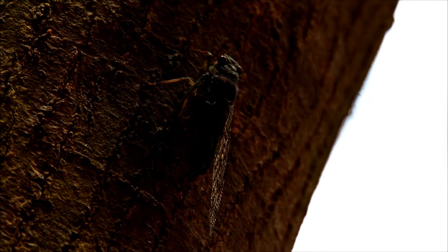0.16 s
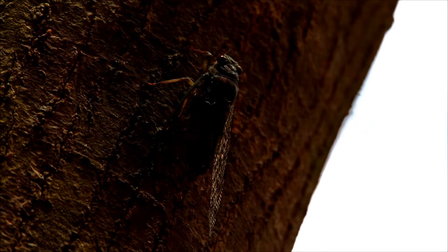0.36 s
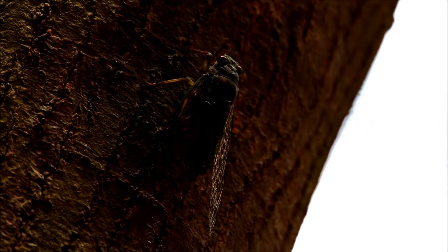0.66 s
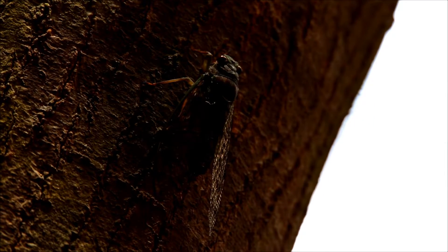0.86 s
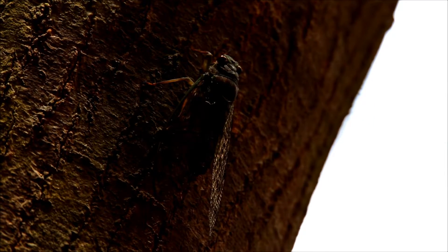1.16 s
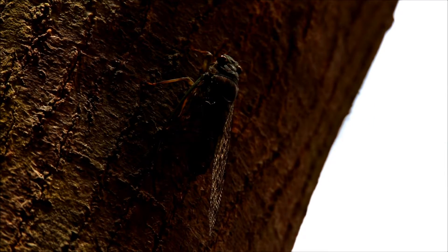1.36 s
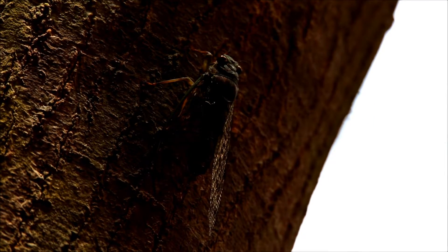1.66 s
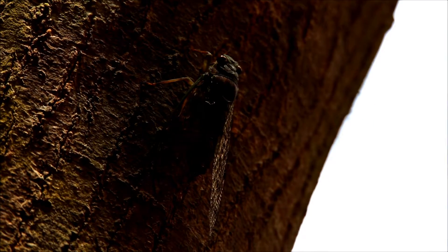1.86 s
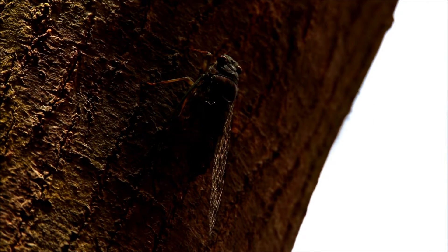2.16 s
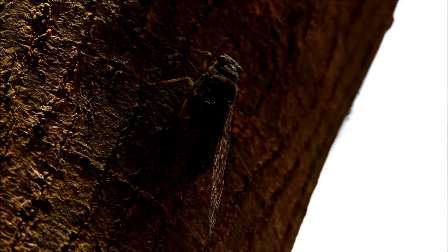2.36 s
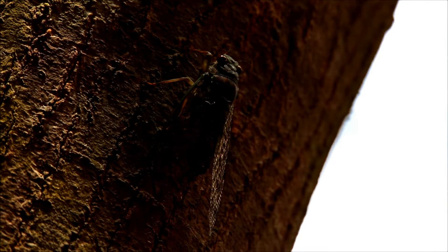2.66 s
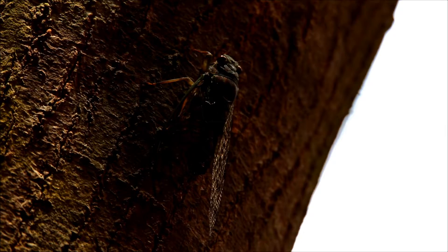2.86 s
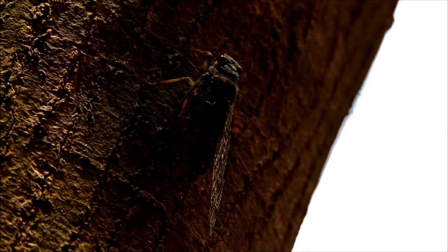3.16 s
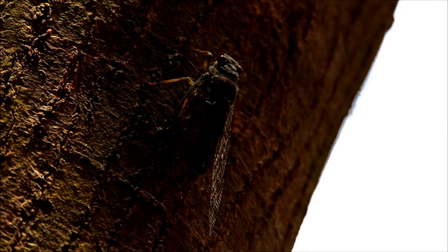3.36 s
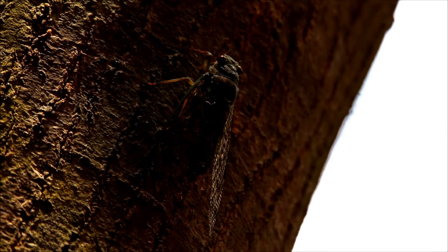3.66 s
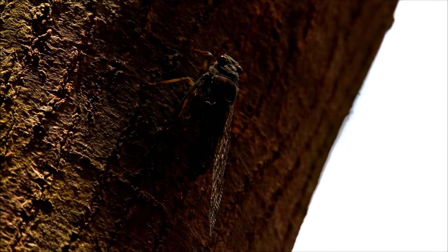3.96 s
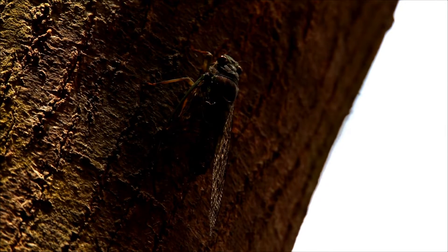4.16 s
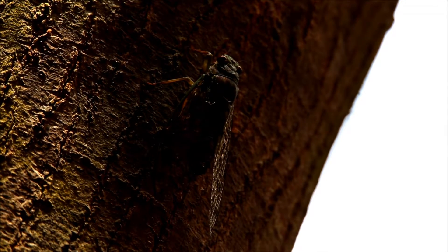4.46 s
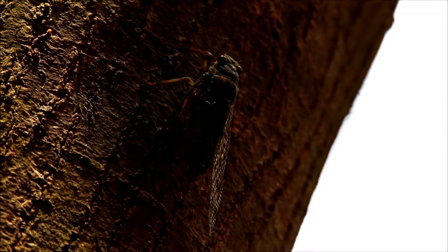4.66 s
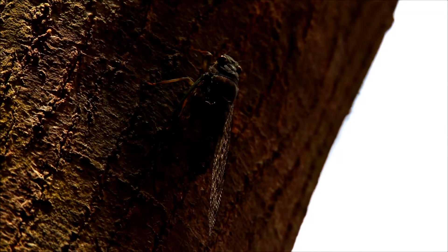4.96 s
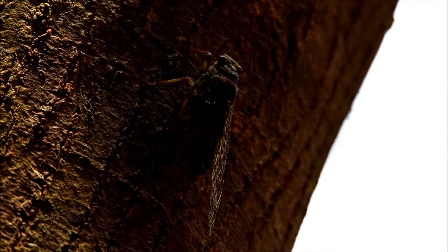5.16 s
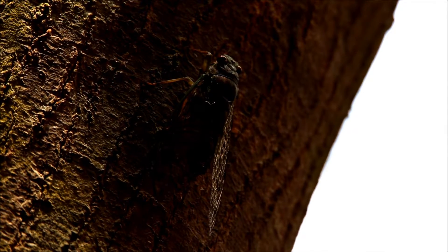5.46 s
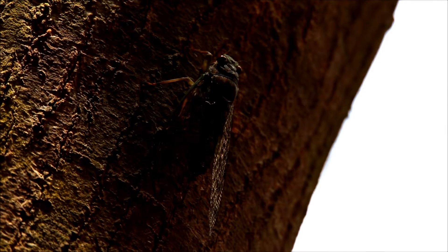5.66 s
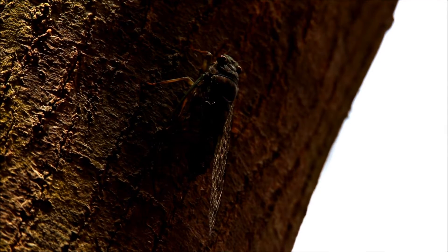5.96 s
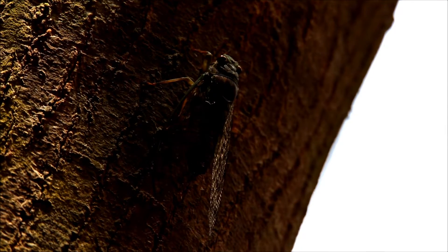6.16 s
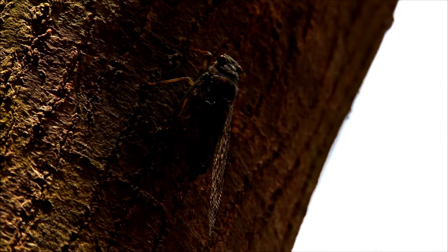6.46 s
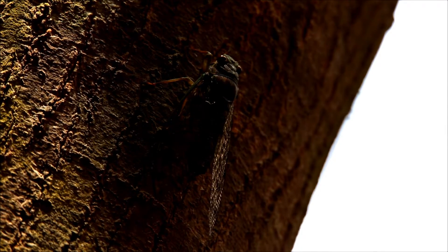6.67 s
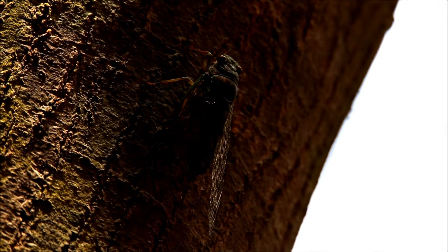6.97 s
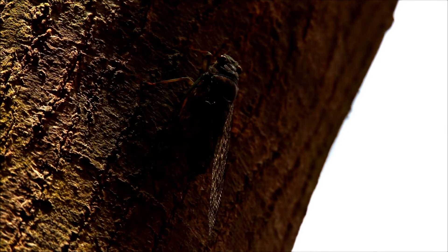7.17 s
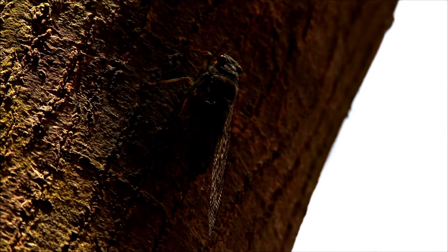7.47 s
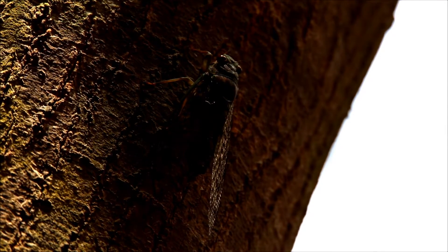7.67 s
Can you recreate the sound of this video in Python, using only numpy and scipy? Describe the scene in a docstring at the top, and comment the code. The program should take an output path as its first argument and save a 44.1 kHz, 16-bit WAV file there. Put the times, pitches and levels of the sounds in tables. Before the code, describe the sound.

Outdoors by a tree, a soft high insect hiss surrounds the listener, with short pulsing rasps and sharp, mid-high ticks at uneven intervals, singly or in quick pairs. One small snap falls near two seconds. The nearby cicada grows steadily from weak buzzing, jumps louder just after four seconds, and holds a dense shrill buzz to the end, nearly covering the background. Wide, natural stereo, close to the insect.

```python
"""A cicada on a tree trunk swells into full song over short rasps and a distant chorus of its kind.
Its two tymbals (ribbed drum skins) buckle in turn, rib by rib, 45 to 50 times a second, and these
clicks ring the hollow abdomen. The rasps, the chorus and the murmur of the air are shaped noise.
Dry, low ticks, perhaps a scolding bird, are short tones with close echoes; a small snap and knock
in the tree are dying bursts of noise. A puff of breeze and a far motor's drone pass low down."""
import sys
import numpy as np
from scipy import signal
from scipy.fft import rfft, irfft, next_fast_len
from scipy.io import wavfile
from scipy.ndimage import uniform_filter1d, map_coordinates

SR = 44100
rng = np.random.default_rng(int(sys.argv[2]) if len(sys.argv) > 2 else 0)


def put_to_file(sound):
    """Save the sound as 16-bit audio at rate SR, in the file named by the first command-line argument."""
    columns = np.atleast_2d(sound).T  # one column per channel
    safe = np.clip(columns, -1, 1)
    whole_steps = np.round(safe * 32767)
    wavfile.write(sys.argv[1], SR, whole_steps.astype(np.int16))


N = 343980  # length of the scene in samples


def amp(db):
    """Decibels to gain."""
    return 10 ** (np.asarray(db) / 20)


def unit(x):
    """x scaled to an rms (average strength) of 1."""
    return x / np.sqrt(np.mean(x ** 2) + 1e-20)


def along(points, hz):
    """(frequency, value) points joined by straight lines on a log frequency axis."""
    point_hz, values = np.transpose(points)
    return np.interp(np.log(hz + 1), np.log(point_hz + 1), values)


def wobble(rate):
    """A smooth random curve through `rate` random points a second."""
    points = rng.standard_normal(int(N * rate / SR) + 4)
    return map_coordinates(points, [np.arange(N) * rate / SR])


def ease(at_s, span_s):
    """An S-curve from 0 to 1, half way at at_s."""
    return .5 + .5 * np.tanh((np.arange(N) / SR - at_s) / (2 * span_s))


def hump(at_s, rise_s, fall_s):
    """A smooth swell from 0 to 1 and back, with its crest at at_s."""
    t = np.arange(N) / SR - at_s
    return np.exp(-(t / np.where(t < 0, rise_s, fall_s)) ** 2)


def filtered(x, response):
    """x with each frequency multiplied by response(frequency)."""
    size = next_fast_len(N + SR // 2)
    hz = np.fft.rfftfreq(size, 1 / SR)
    return irfft(rfft(x, size) * response(hz), size)[..., :N]


def rung(x, spectrum, size=2048):
    """x ringing a body of the given spectrum, which only answers after it is struck."""
    level = amp(along(spectrum, np.fft.rfftfreq(size, 1 / SR)))
    # folding the cepstrum (spectrum of the log spectrum) moves all the ringing after the strike
    cepstrum = irfft(np.log(level))
    cepstrum[1:size // 2] *= 2
    cepstrum[size // 2 + 1:] = 0
    ringing = irfft(np.exp(rfft(cepstrum)))
    return signal.fftconvolve(x, ringing[None], axes=1)[:, :N]


def impulses(times, sizes, order=8):
    """Sharp pulses at times that may fall between samples."""
    at = np.ravel(times)[:, None] * SR
    index = np.floor(at).astype(int) + np.arange(1 - order, order + 1)
    # each pulse is a windowed sinc spread over the nearest samples
    taps = np.ravel(sizes)[:, None] * np.sinc(index - at) * np.sinc((index - at) / order)
    inside = (index >= 0) & (index < N)
    return np.bincount(index[inside], taps[inside], N)


def scattered(x, t60):
    """Diffuse echo from bark and leaves, dying by 60 dB in t60 seconds, different at each ear."""
    t = np.arange(SR // 3) / SR
    fade = amp(-60 * t / t60) * (1 - np.exp(-t / 0.0011))
    tail = rng.standard_normal((2, len(t))) * fade
    return signal.fftconvolve(x[None], tail / np.linalg.norm(tail[0]), axes=1)[:, :N]


def rush(spectrum):
    """Stereo noise of rms 1 arriving from all around."""
    # how alike the two ears hear: (frequency [Hz], left-right likeness [0-1])
    alike = [(40, 0.27), (150, 0.22), (500, 0.45), (1500, 0.68), (4000, 0.37), (8000, 0.5), (13000, 0.22)]

    def mid_and_side(hz):
        # more side against mid makes the two ears less alike
        turn = np.arccos(np.clip(along(alike, hz), -1, 1)) / 2
        return amp(along(spectrum, hz)) * [np.cos(turn), np.sin(turn)]

    mid, side = filtered(rng.standard_normal((2, N)), mid_and_side)
    return unit(np.array([mid + side, mid - side]))


def cicada():
    """Rib clicks and their fine rasp ring the abdomen, whose resonances shift as it stretches."""
    # the body's voice when slack, half stretched and taut: (frequency [Hz], level [dB])
    slack_voice = [(2000, -55), (3270, -13), (3890, -2.5), (4480, -8), (4650, -4), (4950, -9), (5560, 0),
                   (5900, -1), (7120, -9), (8260, -17), (9010, -13.5), (9610, -20.5), (11970, -27),
                   (15580, -37)]
    half_voice = [(2000, -55), (3070, -18), (3620, -1.5), (4230, -7), (4740, 0), (5080, -6), (5740, 0),
                  (7230, -7), (8270, -13.5), (9250, -11), (10170, -21), (11840, -23.5), (15630, -38)]
    taut_voice = [(2000, -55), (2900, -25), (3190, -13), (3690, -1), (4060, -8.5), (4730, 0), (5010, -6.5),
                  (5540, 0), (7110, -6.5), (8020, -12), (9270, -11), (10040, -17.5), (11720, -19.5),
                  (15670, -37)]
    level_db, rate, stretch = singing()
    # the weaker tymbal nearly catches up at full stretch, so the throb evens out
    second_db = -5.5 + 4.3 * stretch
    uneven_rate = rate * (1 + 0.000987 * wobble(6))
    clicks = tymbals(uneven_rate, second_db, jitter=.000025, scatter_db=0.8, offset=.49)
    # the membrane crackles for as long as its ribs are buckling
    crackle = np.sqrt(np.abs(uniform_filter1d(clicks ** 2, size=260)))
    near = clicks + amp(0.5) * unit(crackle * rng.standard_normal(N))
    # bending waves carry the treble first, so each click smears downward in pitch
    near = filtered(near, lambda hz: np.exp(-2.8j * np.sqrt(hz)))
    # nearby bark answers with a steady echo; stirring foliage blurs the rest into a wash
    echo = amp(-8.0) * scattered(near, t60=0.1)
    wash = amp(-1.0) * rush([(3000, 3.6), (9000, 6), (15000, 2.6)])
    drive = filtered(near * amp([[.9], [-.9]]) + echo + wash, resonant)
    # crossfade from slack through half stretched to taut
    song = 0
    for k, voice in enumerate((slack_voice, half_voice, taut_voice)):
        share = np.maximum(0, 1 - np.abs(2 * stretch - k))
        song = song + share * unit(rung(drive, voice))
    return song * amp(level_db)


def singing():
    """Warming up makes the song louder and faster; late in the swell the abdomen stretches."""
    # abrupt harder efforts: (time [s], added level [dB])
    pushes = [(4.19, 3), (4.95, 1.5), (6.35, 0.72)]
    push_s = .02  # time constant of a push
    warm_at_s, warm_s = 3.12, .9  # midpoint and time constant of the warming up
    idle_db, warm_db = -54, -37  # level before the pushes and a slight wavering
    idle_hz, warm_hz = 45.1, 49.9  # muscle rhythm, cycles a second
    # the stretch (0 slack, 1 taut) at rest, when it starts to grow, and its time constant
    rest_stretch, stretch_at_s, stretch_s = 0.18, 5.06, 0.81
    warmth = ease(warm_at_s, warm_s)
    effort_db = sum(db * ease(s, push_s) for s, db in pushes)
    level_db = idle_db + (warm_db - idle_db) * warmth + effort_db
    rate = idle_hz + (warm_hz - idle_hz) * warmth
    stretching_s = np.maximum(0, np.arange(N) / SR - stretch_at_s)
    slack = (1 - rest_stretch) * np.exp(-stretching_s / stretch_s)
    return level_db + 0.35 * wobble(5.7), rate, np.clip(1 - slack, 0, 1)


def tymbals(rate, second_db, jitter, scatter_db, offset):
    """Two tymbals take turns, one weaker; each pull snaps a row of ribs whose spacing drifts slowly."""
    # ribs of one tymbal buckling, before drift and scatter: (time after the first [s], level [dB])
    ribs = [(0, -6), (.00102, -17), (.00205, -7), (.00303, -9), (.00405, -11.5), (.0064, -5)]
    t = np.arange(N) / SR
    cycles = np.cumsum(rate) / SR
    delay, rib_db = np.transpose(ribs)
    clicks = np.zeros(N)
    for lag, side_db in ((0, 0), (offset, second_db)):
        pulls = np.interp(np.arange(int(cycles[-1])) + lag, cycles, t)
        spacing = 1 + 0.022 * np.interp(pulls, t, wobble(2))
        chance = rng.standard_normal((len(pulls), 2, len(ribs)))
        times = pulls[:, None] + spacing[:, None] * delay + jitter * chance[:, 0]
        clicks += amp(side_db) * impulses(times, amp(rib_db + scatter_db * chance[:, 1]))
    return unit(clicks / np.hypot(1, amp(second_db)))


def resonant(hz):
    """Narrow resonances that stand out of the body's voice, added to the plain path."""
    # (centre frequency [Hz], width [Hz], level [dB])
    modes = [(3430, 59, -3.5), (3674, 29, 1.5), (3720, 30, -12), (4150, 16, -9), (4170, 38, -1),
             (4420, 32, -10), (4540, 27, -4), (4750, 40, -13), (5490, 60, -7.5), (5820, 20, -1.5),
             (5870, 38, -11), (6170, 19, -14), (6150, 37, -16), (6495, 35, -4.5), (6970, 31, -1.5),
             (7470, 80, -6.5)]
    total = 1
    for centre, width, db in modes:
        damping = 1j * hz * width
        total = total + amp(db) * damping / (centre ** 2 - hz ** 2 + damping)
    return total


def rasps():
    """Each rasp, perhaps from a neighbouring cicada, is a brief swell of the same bright hiss."""
    # (time of the crest [s], level [dB])
    rasp_list = [(.2, -51), (.5, -53), (.96, -55), (1.49, -51), (2.01, -52), (2.47, -55), (2.78, -54),
                 (3.07, -49), (3.54, -53), (3.96, -50), (4.27, -52), (4.59, -50), (5.03, -48), (5.34, -47),
                 (5.7, -50), (6.1, -49), (6.5, -51), (6.84, -47.5), (7.29, -48), (7.54, -44)]
    # colour of a rasp: (frequency [Hz], level [dB])
    rasp_voice = [(2000, -28), (3600, -3), (6000, 4), (8500, -2), (11000, -6), (15500, -18)]
    rasp_s = 0.058  # time from a rasp's crest to its flank
    swells = sum(amp(db) * hump(s, rasp_s, rasp_s) for s, db in rasp_list)
    return rush(rasp_voice) * swells


def ticks(pitch_hz, vary):
    """Slightly differing ticks, each repeated by the same nearby surfaces."""
    # ticks before echoes and ear levels: (time [s], level [dB])
    tick_list = [(0.001, -36.5), (0.1934, -34), (0.2323, -34.5), (0.6739, -33), (0.7112, -31.5),
                 (0.8849, -32.5), (0.896, -30.5), (0.9683, -32), (1.0295, -33.5), (1.0712, -33),
                 (1.108, -33), (1.1768, -31), (1.3325, -35), (1.47, -33.5), (1.614, -33.5), (1.8543, -32),
                 (1.9146, -32.5), (2.003, -33.2), (2.156, -33), (2.1905, -32), (2.2005, -31.5),
                 (2.2508, -33), (2.2955, -33.5), (2.4035, -31.5), (2.5392, -31), (2.5452, -34),
                 (2.6774, -31), (3.302, -30.5), (3.6678, -33.5), (3.7024, -31), (3.9134, -33.4),
                 (3.943, -33), (3.9746, -31.5), (4.064, -33), (4.076, -31), (4.1793, -31), (4.5273, -33),
                 (4.5598, -33.1), (4.7441, -33), (5.2099, -33), (5.244, -34), (5.2856, -33.5),
                 (5.3785, -31), (5.4069, -33), (5.549, -32), (5.8446, -32.5), (6.1608, -31),
                 (6.7947, -33.5), (6.9172, -33), (7.0107, -31), (7.166, -32.5), (7.3916, -32),
                 (7.5412, -31.5), (7.592, -34), (7.6226, -33.5), (7.711, -32.5), (7.7772, -34)]
    # paths to each ear, direct and off trunks and ground: (delay [s], level [dB])
    paths_left = [(0.0, 0), (0.00161, -11), (0.00286, -16), (0.00556, -11), (0.00723, -17), (0.00844, -8),
                  (0.0095, -17), (0.01118, -10), (0.01338, -17), (0.01558, -15), (0.02456, -10)]
    paths_right = [(0.0, 0), (0.00184, -8), (0.00293, -2), (0.00356, -9), (0.00558, -3), (0.00662, -11),
                   (0.00898, -7), (0.01118, -2), (0.01283, -6), (0.01499, -12), (0.02454, -7)]
    dry = np.zeros(N + SR)
    for s, db in tick_list:
        pulse = tick(pitch_hz * (1 + vary * rng.standard_normal()))
        dry[max(0, round(s * SR)):][:len(pulse)] += amp(db) * pulse
    dry = dry[:N]
    ears = []
    for paths in (paths_left, paths_right):
        arrivals = [amp(db) * np.pad(dry, (round(delay * SR), 0))[:N] for delay, db in paths]
        ears.append(sum(arrivals))
    return np.array(ears) * amp([[-.5], [-2.6]]) + amp(-1) * scattered(dry, t60=0.18)


def tick(pitch_hz, swell=0.0015):
    """A few cycles of one tone, with a weak resonance on either side and a short lower ring."""
    t = np.arange(SR // 20) / SR
    envelope = (t / swell * np.exp(1 - t / swell)) ** 4  # crest after `swell` seconds

    def tone(hz):
        return np.sin(2 * np.pi * hz * t)

    low_flank = amp(-15 + rng.normal(0, 2.2)) * tone(1386)
    high_flank = amp(-13.5 + rng.normal(0, 1.8)) * tone(2810)
    ring = amp(-33) * tone(1800) * amp(-60 * t / .15) * (1 - np.exp(-t / .004))
    return envelope * (tone(pitch_hz) + low_flank + high_flank) + ring


def snaps():
    """A snap and a knock in the tree: each a quickly dying burst of noise around its own pitch."""
    # (time [s], pitch [Hz], level before a 1.5 dB cut [dB], time to die by 60 dB [s])
    snap_list = [(2.054, 2800, -33, 0.029), (2.0625, 760, -47.5, .06)]
    t = np.arange(N) / SR
    out = np.zeros(N)
    for s, hz, db, t60 in snap_list:
        noise = rng.standard_normal(N)
        ring = unit(filtered(noise, lambda f: 1 / (1 + ((f - hz) / (0.21 * hz)) ** 4)))
        out += ring * (t >= s) * amp(db - 1.5 - 60 * np.abs(t - s) / t60)
    return out + amp(-9) * scattered(out, t60=.12)


def chorus():
    """Many far cicadas blur into a gently wavering hiss."""
    # colour of the chorus: (frequency [Hz], level [dB])
    chorus_voice = [(1500, -33), (2600, -5.5), (3700, -2.5), (5000, -2.5), (5700, -3.5), (7000, -3),
                    (8200, -6.5), (9200, -9), (10200, -12), (13000, -14), (15500, -19.5)]
    return rush(chorus_voice) * amp(-47.5 + 0.81 * wobble(30)) * amp([[.2], [-.2]])


def air():
    """The low murmur of the open air, with a puff of breeze and a far motor's drone that swells once."""
    # colour of the murmur: (frequency [Hz], level [dB])
    air_voice = [(20, -4), (55, -0.5), (90, 0), (108, 3), (140, 0), (350, 2), (800, 1.5), (1300, 1),
                 (2500, 2), (4000, -7.5), (9000, -26)]
    puff = amp(-63) * hump(at_s=.72, rise_s=.06, fall_s=0.26)
    breeze = rush([(20, -8), (55, -2), (90, -1), (200, -25), (600, -70)]) * puff
    # the swell is added to a steady level
    swell = amp(-84) + amp(-70) * hump(at_s=2.95, rise_s=0.18, fall_s=0.18)
    drone_hz = 105 + 2 * wobble(8)
    tone = np.sqrt(2) * np.sin(2 * np.pi * np.cumsum(drone_hz) / SR)
    drone = tone * swell * amp(2.1 * wobble(10))
    return rush(air_voice) * amp(-52.0) + breeze + drone


def scene():
    """The near singer, the rasps, the ticks and the snaps over chorus and air."""
    return cicada() + rasps() + ticks(pitch_hz=1976, vary=0.026) + snaps() + chorus() + air()


def record(dry):
    """Keeps nothing from the band limit of 15700 Hz upward."""
    return filtered(dry, lambda hz: hz < 15700)


dry = scene()
out = record(dry)
put_to_file(out)
```